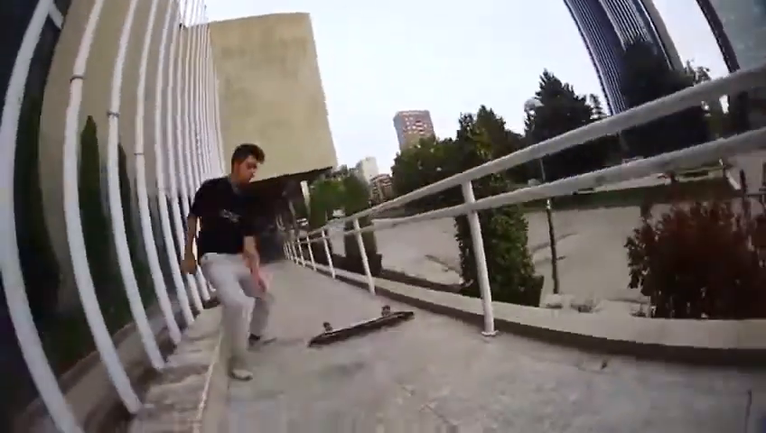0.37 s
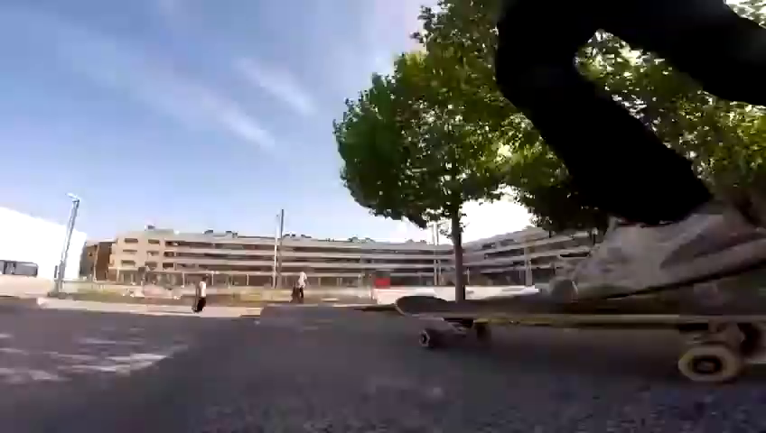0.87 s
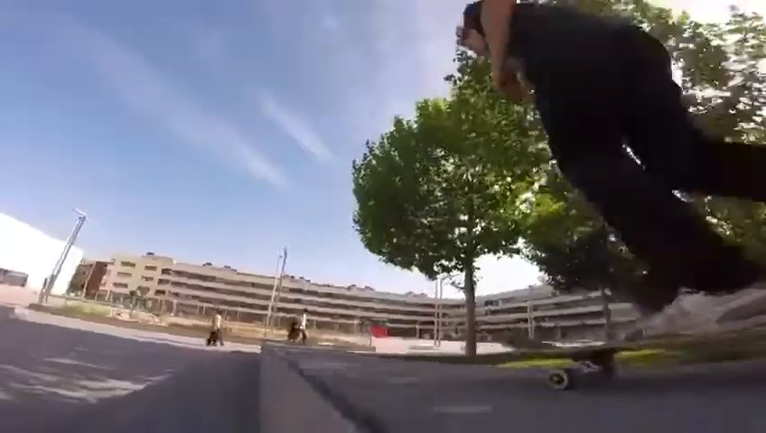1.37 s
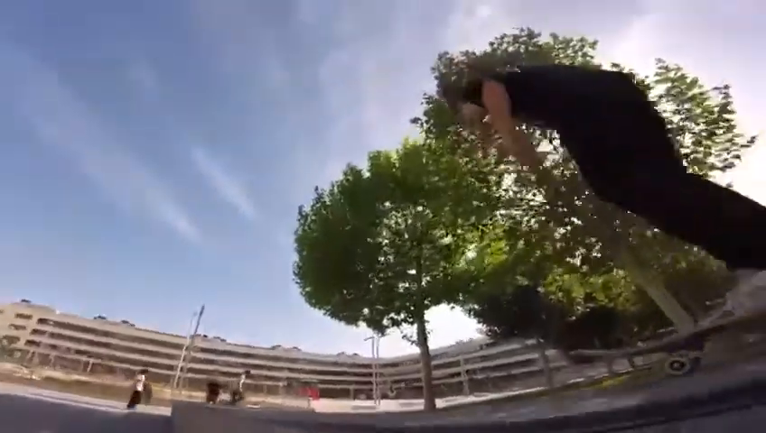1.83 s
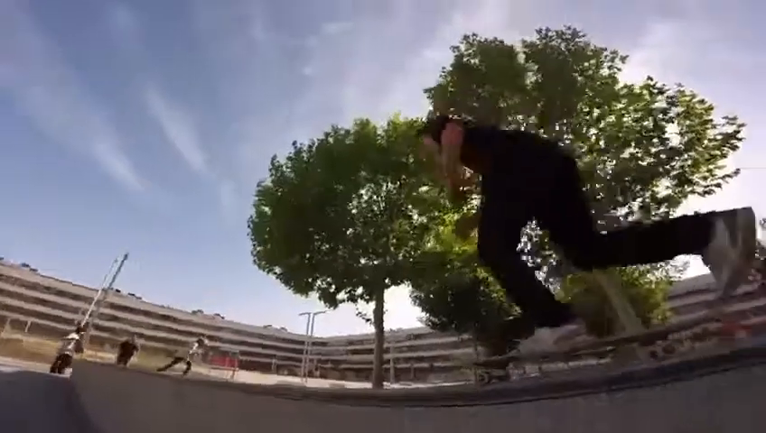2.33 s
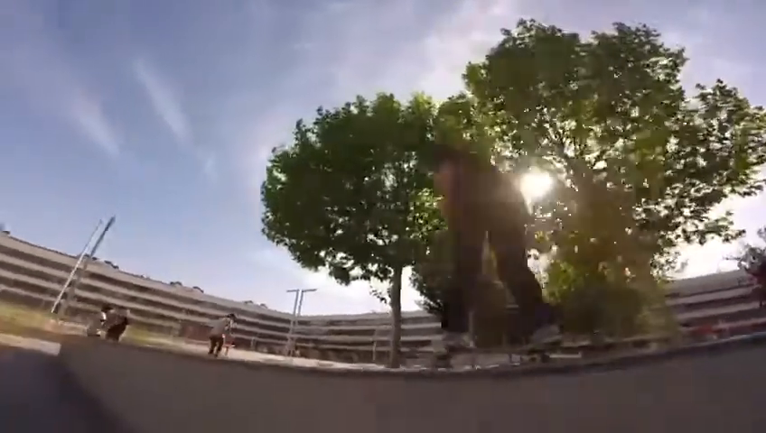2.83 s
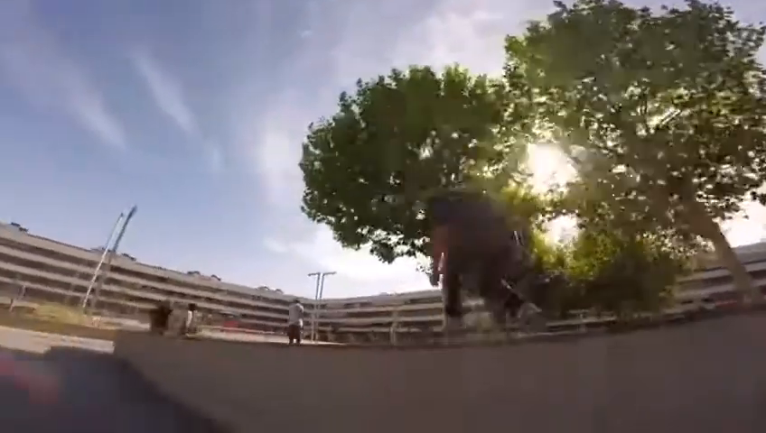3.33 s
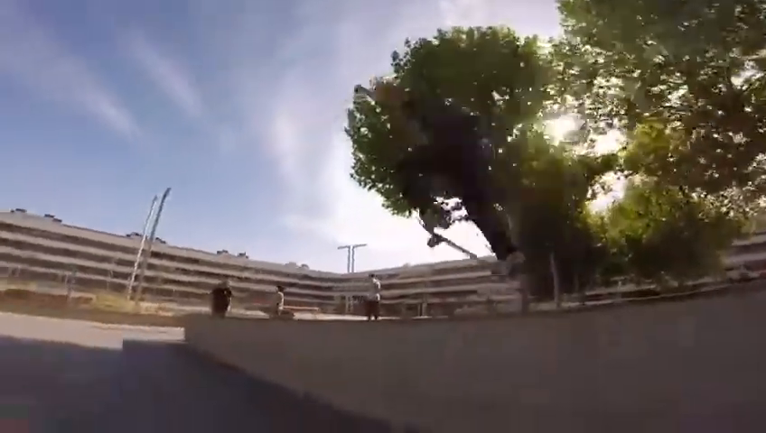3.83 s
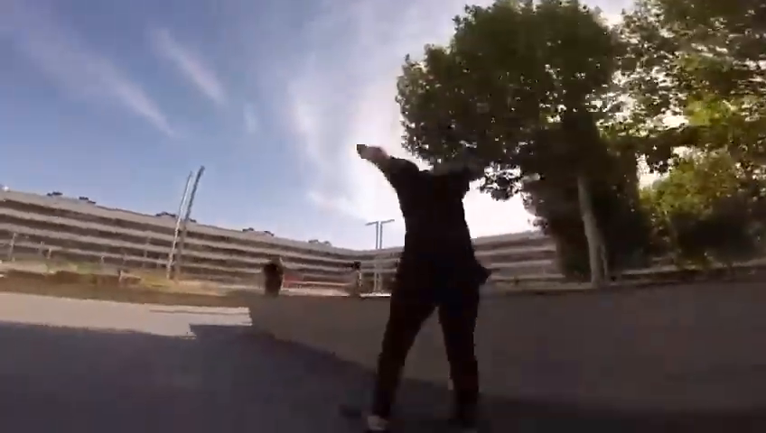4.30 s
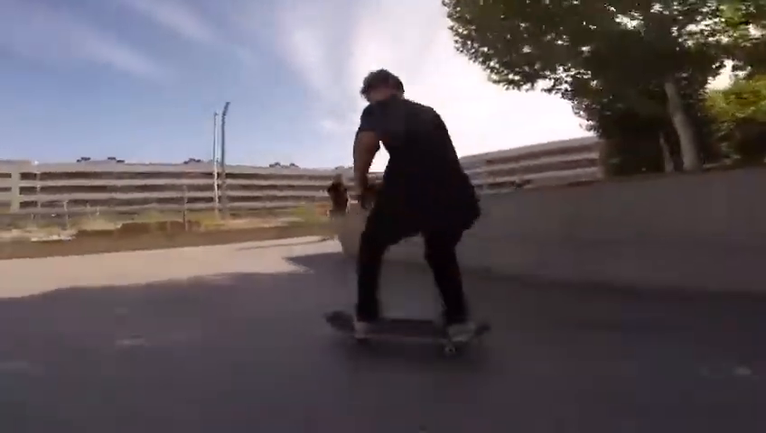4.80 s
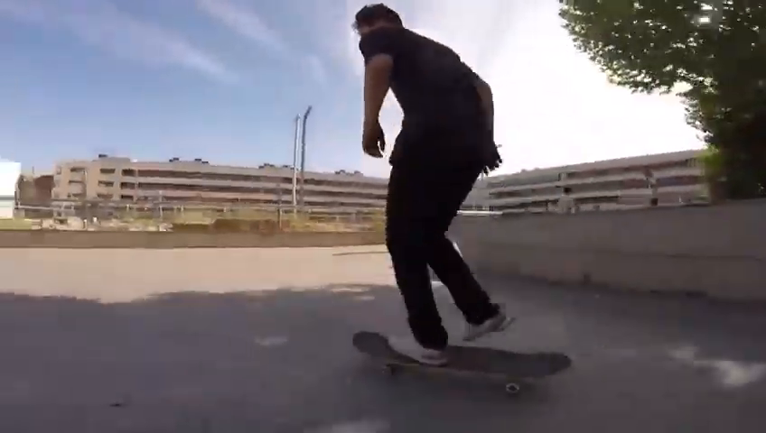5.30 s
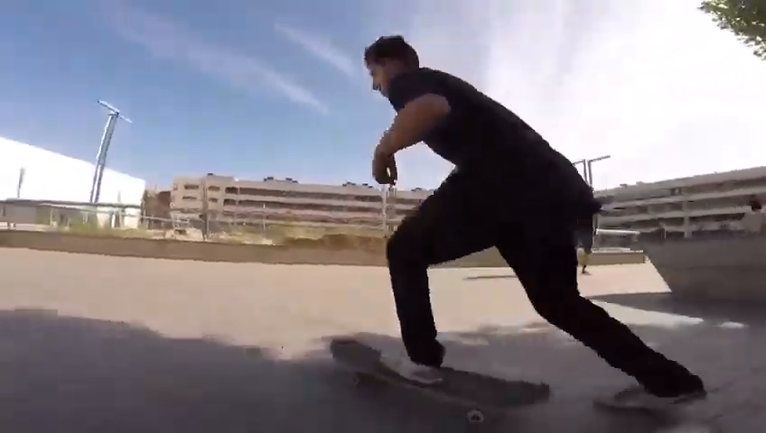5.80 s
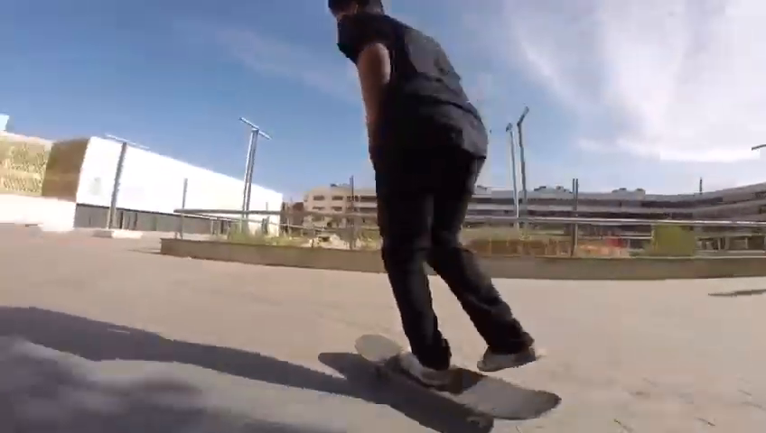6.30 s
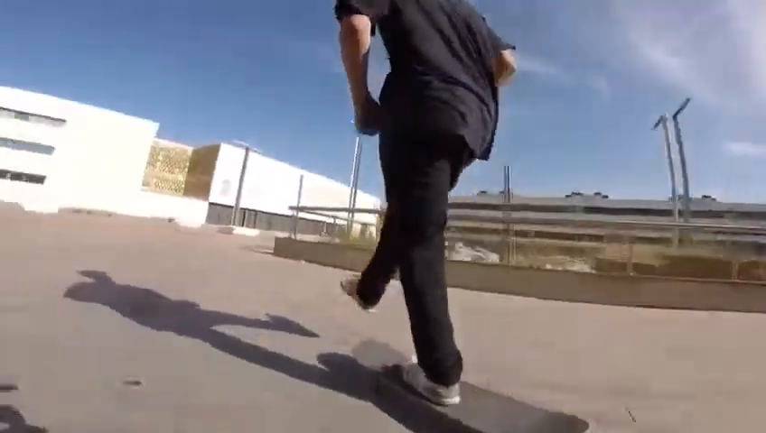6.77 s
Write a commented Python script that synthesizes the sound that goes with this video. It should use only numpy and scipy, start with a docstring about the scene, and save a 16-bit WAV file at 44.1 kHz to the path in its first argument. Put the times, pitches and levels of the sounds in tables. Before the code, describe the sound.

From 0 to 0.9 s a loose skateboard tumbles on a concrete walkway: very loud, hollow wooden clacks, the hardest near 0.06 s and in a rapid cluster at 0.7-0.76 s, over coarse dragging and scraping, with a short echo from a close wall. At 0.92 s it cuts suddenly to a far quieter open plaza with faint distant town noise. A deep, uneven wheel hum pulses with a low shake; gritty rolling fades in by about 1.5 s, with thin faint squeaks near 1.45 and 2.3 s. Small dull knocks and metallic truck rattles mark stones and joints. A high tick at 3.8 s and a light scuff at 4.2 s precede one hard, bright landing smack at 4.34 s with a tiny rebound. Rolling continues, growing louder and rougher from 5.5 s, with denser knocks and high scuffs around 6.4 s, still rumbling at the end near 6.9 s.

```python
"""A skateboard, heard in two scenes. First a loose board tumbles, clacks and scrapes along a concrete walkway.
Then we ride on a board beside a skater over a plaza: a wheel hums as it turns, grit rings the decks and trucks,
stones and joints knock, a wheel squeaks, there are high ticks and scuffs, and one hard landing.
Rolling and dragging are noisy streams of grit sent through resonances. Knocks are short bursts of noise that
ring the struck spot and the whole board. The hum is a sine wave and its octave; the far town is soft noise."""
import sys
import numpy as np
from scipy import signal
from scipy.fft import rfft, irfft
from scipy.io import wavfile
from scipy.ndimage import uniform_filter1d

SR = 44100
rng = np.random.default_rng(int(sys.argv[2]) if len(sys.argv) > 2 else 0)


def linear_from_db(decibels):
    """Turn decibels (scalar or array-like) into linear amplitude factors; 0 gives 1."""
    return 10 ** (np.asarray(decibels, float) / 20)


def generate_wav(sig):
    """Save sig (samples, or channels by samples) to the path in sys.argv[1] as 16-bit PCM at SR."""
    pcm = np.round(np.clip(np.atleast_2d(sig).T, -1, 1) * 32767).astype(np.int16)
    wavfile.write(sys.argv[1], SR, pcm)


N = 304290  # length in samples

# Loose board dragging (t/s, deck level/dB, gritty hiss level/dB)
LOOSE_DRAG = [(0, -24, -39), (.1, -36.5, -45.5), (.28, -26.5, -43), (.345, -33.5, -37), (.372, -26, -29),
              (.385, -34.5, -46.5), (.47, -28, -42.5), (.6, -24.5, -43.5), (.742, -23, -37.5),
              (.785, -30.5, -43), (.92, -34, -38.5)]
# Loose board's clacks, before their bass is cut
# (t/s, knock peak level/dB, struck pitch f/Hz, crack level over the knock/dB, contact t60/s)
LOOSE_CLACKS = [(.013, -12, 534, -34.5, 0.022), (.032, -18.5, 2020, -3, 0.031),
                (.0575, -2.5, 1010, -6, 0.063), (.157, -25.5, 2340, -7.5, 0.057),
                (.1885, -12.5, 1810, -19, 0.11), (.19, -13.5, 607, -25, 0.037),
                (.209, -8.5, 650, -14.5, 0.061), (.214, -8, 1400, -16.5, 0.067),
                (.257, -22.5, 705, -11, .14), (.277, -17, 1360, -7, 0.16), (.287, -20, 704, -27.5, 0.11),
                (.299, -20.5, 1400, -13.5, 0.11), (.329, -21.5, 790, -4.5, 0.044),
                (.361, -20, 1330, 1.5, 0.038), (.371, -21.5, 2020, -7.5, 0.056),
                (.406, -33.5, 910, 4.5, .049), (.486, -14.5, 1110, -22.5, 0.14),
                (.503, -23, 1200, -23, 0.041), (.526, -13.5, 700, -17, 0.021),
                (.594, -13.5, 594, -18.5, .14), (.617, -11.5, 680, -43, 0.077),
                (.631, -15.5, 557, -17.5, 0.11), (.658, -16, 565, -25, .19), (.693, -7, 600, -22, 0.076),
                (.705, -13.5, 370, -38, 0.053), (.722, -11, 800, -32, 0.049), (.736, -11, 670, -44, 0.098),
                (.7455, -8, 1030, -25, 0.048), (.7515, -3, 800, -19, .034), (.761, -12, 880, -22, .02)]
# Resonances of the loose deck (f/Hz, width/Hz, relative level/dB)
LOOSE_DECK_MODES = [(360, 167, 15.5), (650, 120, -1.5), (1030, 90, 1.5), (1400, 67, -14), (1950, 250, 3),
                    (2650, 100, -19.5)]
# Broad tone colour of the loose board's wood (f/Hz, relative level/dB)
LOOSE_BODY_COLOUR = [(40, -26), (150, -18), (300, -12), (500, -9), (740, -2), (920, -14.5), (1100, -5.5),
                     (1500, -10.5), (2000, -13), (2800, -24), (5000, -76.5)]
# Tone colour of the loose board's hiss and cracks (f/Hz, relative level/dB)
LOOSE_HISS_COLOUR = [(1180, -26.5), (2000, -15.5), (2390, -4.5), (2770, -5.5), (4050, -3.5), (4410, -7),
                     (9570, -16), (10300, -19), (11000, -50), (14200, -56), (22000, -120)]

# Boards rolling, before the ground's ups and downs
# (t/s, deck level/dB, truck ring level/dB, gritty hiss level/dB)
ROLL_LEVELS = [(.95, -72.5, -73, -74), (1.25, -71, -65, -74.5), (1.36, -60, -53.5, -62),
               (1.5, -50, -50, -60.5), (1.7, -45.5, -47, -61.5), (1.9, -52.5, -54, -59),
               (2.1, -50, -53.5, -59), (2.29, -45.5, -39, -51), (2.42, -46.5, -51, -66),
               (2.6, -46, -49, -59), (3.19, -46.5, -45.5, -64), (4.0, -49, -50, -67.5),
               (4.32, -47, -46.5, -68), (4.4, -45, -47.5, -57), (4.74, -45.5, -46.5, -63.5),
               (5.15, -47.5, -57, -55), (5.5, -42.5, -39, -57), (5.82, -46.5, -46, -53),
               (5.88, -49, -52, -59), (6.2, -42.5, -43.5, -60.5), (6.43, -38.5, -38, -51),
               (6.62, -41, -42.5, -55), (6.9, -42.5, -39, -54)]
# Resonances of the rolling decks (f/Hz, width/Hz, relative level/dB)
DECK_MODES = [(492.6, 70, 12.5), (700, 196, 4.5), (821, 227, -33)]
# Broad tone colour of the rolling decks (f/Hz, relative level/dB)
DECK_COLOUR = [(71, -45), (120, 5), (410, 9), (514, 5.5), (848, 6.5), (1220, -23), (1370, -15), (1690, 7),
               (2400, -33), (3120, -121), (5280, -120)]
# Resonances of the metal trucks (f/Hz, width/Hz, relative level/dB)
TRUCK_MODES = [(1220, 158, 3), (1565, 129, -8.5), (1093, 250, -6.5)]
# Tone colour of the rolling hiss and of the cracks in the plaza (f/Hz, relative level/dB)
HISS_COLOUR = [(1120, -8.5), (1900, -1.5), (2180, 0.5), (2380, -6), (2470, -5.5), (2660, 2), (3150, 4),
               (4550, -9), (5260, -5.5), (5880, -12), (7650, -7), (10100, -32), (11000, -67), (14200, -87),
               (22000, -120)]

# Turning speed of the humming wheel, before small wobbles (t/s, turns a second f/Hz)
WHEEL_TURNS = [(.93, 32.88), (1.4, 37.92), (2.4, 40.07), (2.62, 42.85), (2.85, 37.93), (3.6, 38),
               (4.6, 36.43), (5.3, 33.28), (5.6, 38.3), (6.3, 31.7), (6.9, 36.9)]
# Level of the wheel hum, before small wobbles (t/s, level/dB)
HUM_LEVEL = [(0.93, -31), (1.11, -52), (1.83, -30), (1.96, -42), (2.11, -31), (2.19, -51), (2.24, -38.5),
             (2.44, -30), (2.68, -53), (2.73, -35), (2.87, -41), (2.96, -30.5), (4.09, -51.5),
             (4.64, -35.5), (4.69, -44.5), (5.09, -39), (5.4, -48.5), (5.47, -36.5), (5.89, -43.5),
             (5.95, -54), (6.05, -43), (6.15, -60), (6.22, -35), (6.38, -53), (6.42, -37.5), (6.77, -45.5),
             (6.9, -36)]
# Low shaking from rough ground (t/s, level/dB)
SHAKE_LEVEL = [(.93, -42), (1.18, -46.5), (1.4, -42), (2.75, -42.5), (3.2, -47.5), (6.7, -50), (6.9, -47)]
# Tone colour of the low shaking (f/Hz, relative level/dB)
SHAKE_COLOUR = [(8, -13), (20, -10), (30, -15.5), (55, 6), (75, -1), (95, -11.5), (150, -11.5),
                (250, -25.5), (400, -73.5)]

# Tone colour of the far town (f/Hz, relative level/dB)
TOWN_COLOUR = [(88, -23.5), (150, -1), (188, -14), (221, -6.5), (1170, -16), (1350, -49), (2060, -23),
               (2410, -23.5), (10000, -37), (13000, -97), (22000, -120)]

# Stones and joints under the wheels
# (t/s, knock peak level/dB, struck pitch f/Hz, crack level over the knock/dB)
STONE_KNOCKS = [(1.047, -53.5, 1220, 3), (1.211, -44.5, 471, -7.5), (1.537, -38, 604, -10),
                (1.627, -29, 680, -13.5), (1.709, -38, 1190, -18), (1.96, -41.5, 1110, -1.5),
                (2.073, -31, 736, -7.5), (2.258, -28.5, 1180, -26), (2.591, -34, 1220, -6),
                (2.73, -37, 1220, -9), (2.88, -32.5, 1170, -37), (3.248, -37, 1230, -11),
                (3.288, -31, 1210, -17), (3.375, -28.5, 1110, -23), (3.513, -40, 1210, -10),
                (3.692, -27.5, 700, -20), (3.739, -36, 1170, -10), (3.931, -33, 1220, -37),
                (4.258, -33, 1200, -27), (4.59, -33, 1220, -28), (4.647, -35.5, 560, -8.5),
                (4.705, -30.5, 1180, -28), (4.753, -37.5, 1150, -30), (4.825, -45, 490, 4),
                (4.883, -32, 1110, -11.5), (5.136, -30, 563, -28), (5.373, -28, 1220, -27),
                (5.498, -29, 1140, -13), (5.674, -26, 1220, -12.5), (6.05, -27, 1180, -25),
                (6.151, -22.5, 1250, -13), (6.234, -36, 750, -6), (6.331, -30, 1220, -9),
                (6.389, -25.5, 1190, -19), (6.449, -24, 1240, -18), (6.576, -28.5, 1270, -23),
                (6.595, -23.5, 920, -11.5), (6.709, -24, 726, -14)]
# Thin squeaks of a wheel (t/s, knock peak level/dB, pitch f/Hz)
WHEEL_SQUEAKS = [(1.445, -39.5, 1740), (1.478, -40, 1710), (2.24, -53, 2770), (2.29, -42.5, 2800)]
# High ticks and scuffs, pitched between 2380 and 3030 Hz
# (t/s, knock peak level/dB, pitch f/Hz, contact t60/s)
HIGH_TICKS_AND_SCUFFS = [(3.781, -30.5, 2920, 0.026), (3.81, -45.5, 3030, 0.22), (4.227, -39.5, 2580, 0.03),
                         (6.393, -37, 2450, 0.12), (6.418, -36.5, 2380, 0.26), (6.445, -40, 3000, .2)]
# Landing: wheels, trucks, deck and a small rebound
# (t/s, knock peak level/dB, struck pitch f/Hz, crack level over the knock/dB, contact t60/s)
LANDING_BLOWS = [(4.3369, -21, 865, 1, 0.011), (4.3392, -11.5, 3430, 4.5, .014),
                 (4.342, -14.5, 696, -3, 0.037), (4.346, -19.5, 3120, -8, 0.026),
                 (4.351, -20.5, 1100, -9, 0.033), (4.346, -28.5, 298, -23, 0.059),
                 (4.3594, -28.5, 600, -11, 0.026), (4.383, -41, 3200, -1, 0.077)]


def colour(x, points):
    """Causal filter whose gain follows (f/Hz, level/dB) points."""
    hz, db = np.transpose(points)
    grid = np.maximum(np.fft.rfftfreq(8192, 1 / SR), 1)  # avoids log(0)
    log_gain = np.interp(np.log(grid), np.log(hz), db) * np.log(10) / 20
    # Folding the cepstrum forward in time makes the filter minimum-phase: no sound before its cause
    cepstrum = irfft(log_gain)
    cepstrum[1:4096] *= 2
    cepstrum[4097:] = 0
    response = irfft(np.exp(rfft(cepstrum)))
    return signal.fftconvolve(x, response)[:len(x)]


def ring(x, hz, width):
    """One resonance, gain 1 at its centre."""
    return signal.lfilter(*signal.iirpeak(hz, hz / width, SR), x)


def modes(x, table):
    """Sum of (f/Hz, width/Hz, level/dB) resonances with alternating sign."""
    return sum((-1) ** k * linear_from_db(db) * ring(x, hz, width) for k, (hz, width, db) in enumerate(table))


def unit(x):
    """Scale to rms 1."""
    return x / np.sqrt(np.mean(x ** 2))


def curves(table):
    """Columns of a (t/s, value, ..) table, joined by straight lines, at every sample."""
    s, *columns = np.transpose(table)
    return [np.interp(np.arange(N) / SR, s, column) for column in columns]


def walk(rate):
    """Random levels held for 1 / rate seconds, then smoothed twice; spread near 1."""
    hold = int(SR / rate)
    steps = np.repeat(rng.standard_normal(N // hold + 1), hold)
    return 1.33 * uniform_filter1d(uniform_filter1d(steps, hold), hold)[:N]


def grit(rate, spread_db, smooth):
    """Grains of concrete of very unequal size (rate a second), over smooth rubbing noise."""
    happens, side, size = rng.random((3, N))
    grains = (happens < rate / SR) * np.sign(side - .5) * linear_from_db(-spread_db * np.log(size + 0.003))
    return unit(unit(grains) + smooth * rng.standard_normal(N))


def blows(table, body, hiss, rise_s, first, body_db):
    """A sharp first touch and a brief rough contact ring the struck spot and the whole board, and crack.

    Rows: (t/s, knock peak level/dB, pitch f/Hz, crack level/dB, contact t60/s, ring width as share of pitch).
    """
    out, t = np.zeros(N + 8192), np.arange(8192) / SR
    noise = rng.standard_normal((len(table), 2, len(t)))
    for (s, db, hz, crack_db, t60, share), (push, snap) in zip(table, noise):
        shape = (1 - np.exp(-t / rise_s)) * np.exp(-np.log(1000) * t / max(t60, .005))
        touch = first * (t == t[1])  # a single-sample click
        soft = signal.lfilter(*signal.butter(2, 1.86 * hz, fs=SR), push * shape + touch)  # wood and rubber give way
        width = np.clip(share, .03, 2.5) * hz
        spot = ring(ring(soft, hz, width), hz, width)
        whole = modes(soft, body)
        whole_gain = linear_from_db(body_db) * min(share, 1)  # narrow rings stir the whole board less
        knock = spot / np.abs(spot).max() + whole_gain * whole / np.abs(whole).max()
        crack = colour(snap * shape ** 0.97 + 0.1 * touch, hiss)
        both = knock / np.abs(knock).max() + linear_from_db(crack_db) * crack / np.abs(crack).max()
        i = int(s * SR)
        out[i:i + len(t)] += linear_from_db(db) * both
    return out[:N]


def space(x, t60, wet_db, top_hz):
    """Diffuse return from ground and walls, duller than the direct sound."""
    t = np.arange(int(SR * .5)) / SR
    # Fading noise that starts 6 ms after the direct sound
    tail = unit(rng.standard_normal(len(t))) * np.exp(-np.log(1000) * t / t60) * (t > .006)
    tail = signal.lfilter(*signal.butter(1, top_hz, fs=SR), tail) / np.sqrt(np.sum(tail ** 2))
    return x + linear_from_db(wet_db) * signal.fftconvolve(x, tail)[:N]


def loose_board():
    """Wood dragging on concrete between clacks, in a walkway with a wall close by."""
    deck_db, hiss_db = curves(LOOSE_DRAG)
    drag = grit(2200, spread_db=1.0, smooth=0.86) * linear_from_db(2.7 * walk(60.2))
    resonances = unit(modes(drag, LOOSE_DECK_MODES))
    deck = unit(linear_from_db(-14.0) * resonances + unit(colour(drag, LOOSE_BODY_COLOUR)))
    hiss = unit(colour(grit(1900, spread_db=2.0, smooth=0.58), LOOSE_HISS_COLOUR))

    # Harder clacks ring wider: 0.57 of the pitch at -14.5 dB, and 0.58 dB wider for each dB above
    rows = [(*row, 0.57 * linear_from_db(0.58 * (row[1] + 14.5))) for row in LOOSE_CLACKS]
    clacks = blows(rows, LOOSE_DECK_MODES, LOOSE_HISS_COLOUR, rise_s=0.00043, first=3.9, body_db=-4.5)
    clacks = signal.lfilter(*signal.butter(2, 230, "high", fs=SR), clacks)  # a thin deck radiates little bass
    clacks = space(clacks, t60=0.77, wet_db=-15.0, top_hz=5000)
    return linear_from_db(deck_db) * deck + linear_from_db(hiss_db) * hiss + clacks


def rolling():
    """Shared grit shakes the decks, rings the trucks and hisses, with extra grains for the last two."""
    patch_db = 1.5 * walk(7.2)  # the ground changes from patch to patch, 7.2 patches a second
    deck_gain, truck_gain, hiss_gain = (linear_from_db(db + patch_db) for db in curves(ROLL_LEVELS))
    ground = grit(900, spread_db=4.5, smooth=1.0) * linear_from_db(1.44 * walk(30))

    resonances = unit(modes(ground, DECK_MODES))
    deck = unit(linear_from_db(-2.5) * resonances + unit(colour(ground, DECK_COLOUR)))

    rattle = ground + grit(600, spread_db=6.5, smooth=1.0)
    truck = unit(sum(linear_from_db(db) * ring(ring(rattle, hz, width), hz, width) for hz, width, db in TRUCK_MODES))
    truck = truck * linear_from_db(2.53 * walk(60))

    fine_grit = grit(500, spread_db=4.5, smooth=1.6) * linear_from_db(0.77 * walk(37))
    hiss = unit(colour(1.04 * ground + fine_grit, HISS_COLOUR))
    return deck_gain * deck + truck_gain * truck + hiss_gain * hiss


def wheel_hum():
    """A slightly out-of-round wheel hums once a turn, unevenly; rough ground adds a low shake."""
    (hz,), (hum_db,), (shake_db,) = curves(WHEEL_TURNS), curves(HUM_LEVEL), curves(SHAKE_LEVEL)
    turn = 2 * np.pi * np.cumsum(hz * (1 + .11 * walk(30))) / SR  # angle in radians
    wave = np.sqrt(2) * (np.sin(turn) + linear_from_db(-19.5) * np.sin(2 * turn))
    hum = wave * linear_from_db(1.7 * walk(30) + 1.0 * walk(5.7))
    shake = unit(colour(rng.standard_normal(N), SHAKE_COLOUR))
    return linear_from_db(hum_db) * hum + linear_from_db(shake_db) * shake


def far_town():
    """The many faint sounds of a distant town blur into steady, soft noise."""
    return linear_from_db(-61) * unit(colour(rng.standard_normal(N), TOWN_COLOUR))


def plaza_knocks():
    """Stones, joints, landing, squeaks, high ticks and scuffs all ring the deck and trucks in the open plaza."""
    # Complete each row with its missing crack level/dB, contact t60/s and ring width as share of pitch
    stones = [(*row, 0.042, 0.5) for row in STONE_KNOCKS]
    landing = [(*row, 0.49) for row in LANDING_BLOWS]
    squeaks = [(*row, -34, 0.12, 0.081) for row in WHEEL_SQUEAKS]
    high_ticks = [(s, db, hz, -7, t60, 0.31) for s, db, hz, t60 in HIGH_TICKS_AND_SCUFFS]
    rows = stones + landing + squeaks + high_ticks
    knocks = blows(rows, DECK_MODES + TRUCK_MODES, HISS_COLOUR, rise_s=0.00019, first=3.3, body_db=-21)
    return space(knocks, t60=0.31, wet_db=-18.5, top_hz=3960)


def scene():
    """The walkway gives way to the plaza in a 15 ms crossfade centred at 0.922 s."""
    second = np.clip((np.arange(N) / SR - .922) / 0.015 + .5, 0, 1)
    plaza = rolling() + wheel_hum() + far_town() + plaza_knocks()
    return ((1 - second) * loose_board() + second * plaza)[None]


def roll_off(x):
    """The treble ends steeply here."""
    return signal.sosfilt(signal.butter(12, 11110, fs=SR, output="sos"), x)


def record(dry):
    """Clip the mix at full scale, which the loudest clacks just reach."""
    mix = np.clip(dry, -1, 1)
    return roll_off(mix)


dry = scene()
out = record(dry)
generate_wav(out)
```